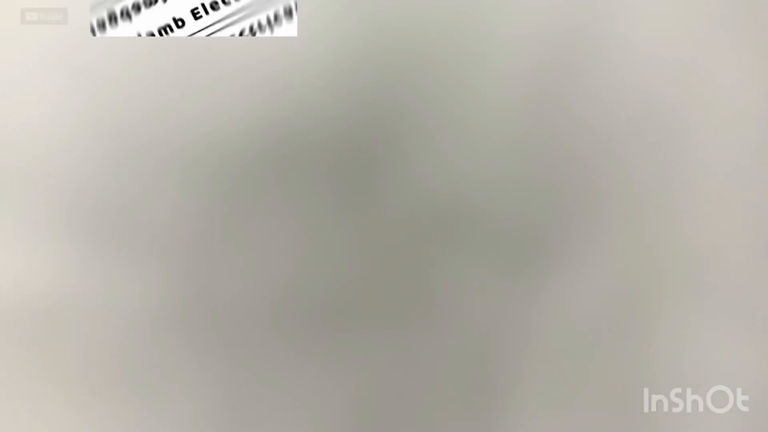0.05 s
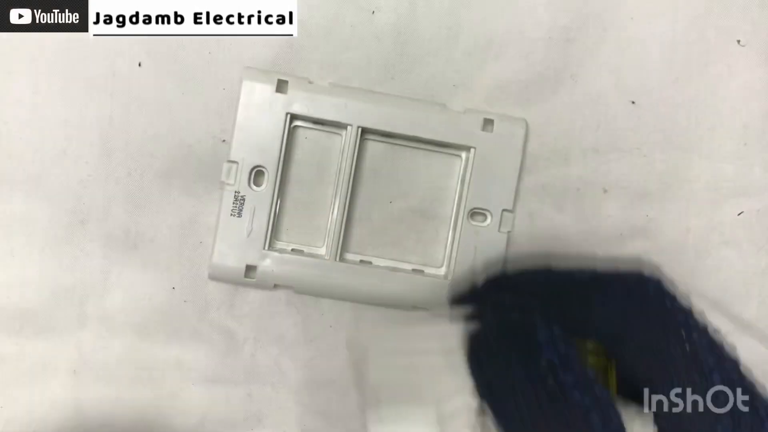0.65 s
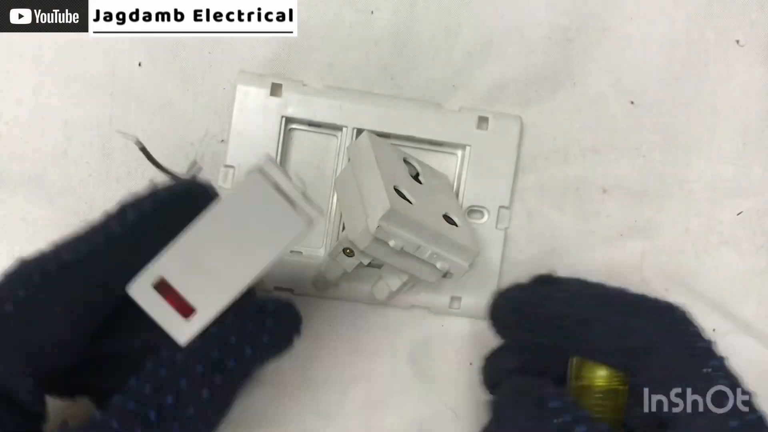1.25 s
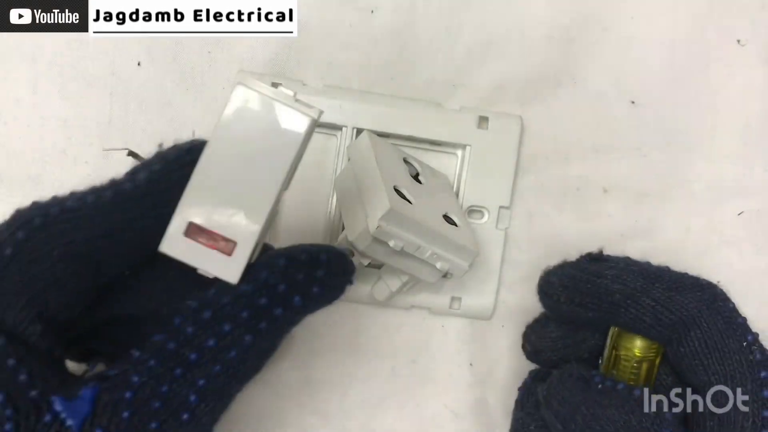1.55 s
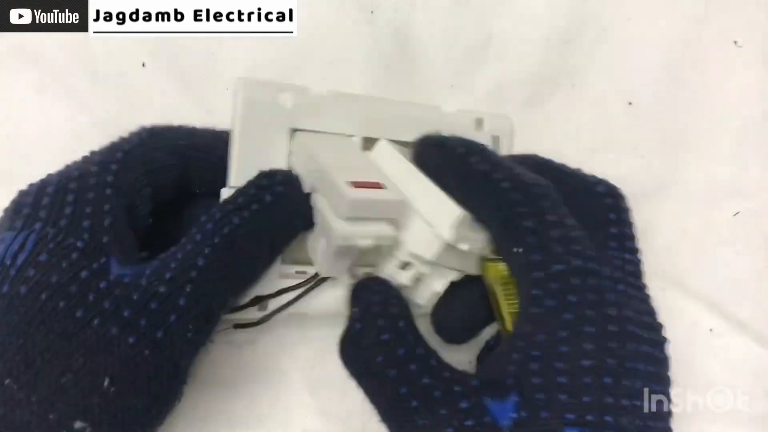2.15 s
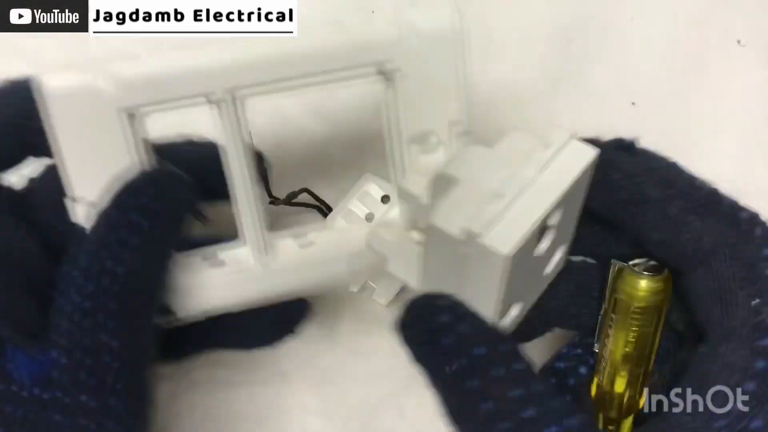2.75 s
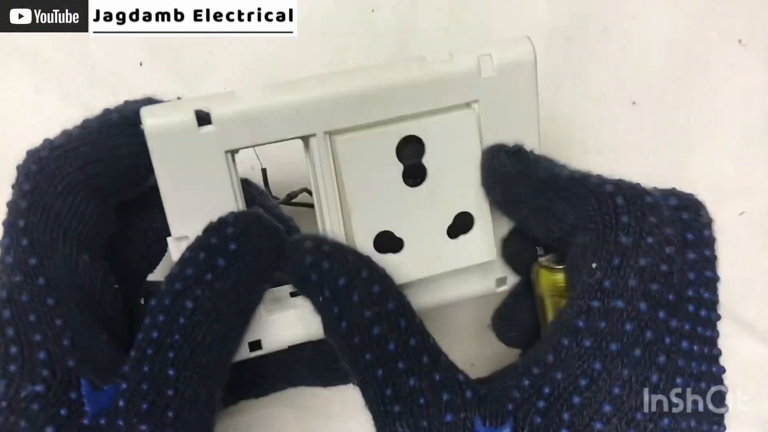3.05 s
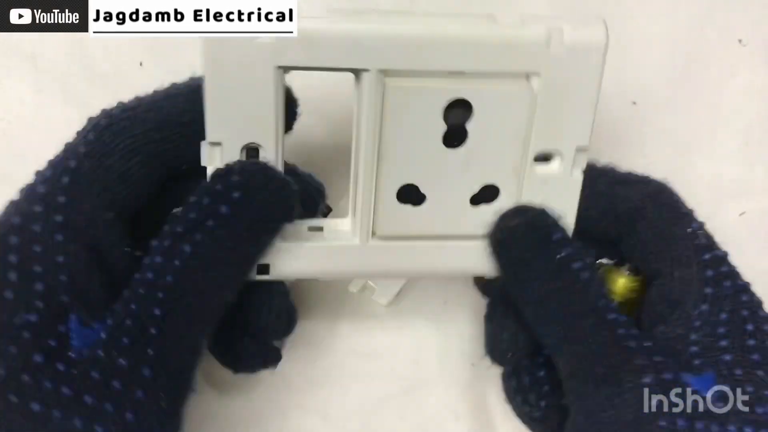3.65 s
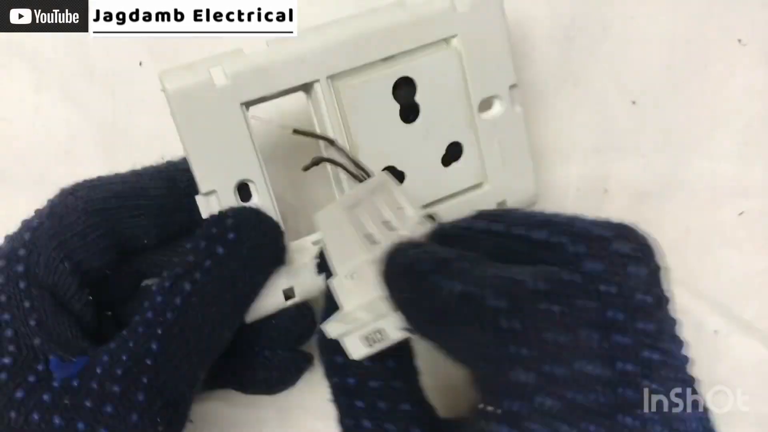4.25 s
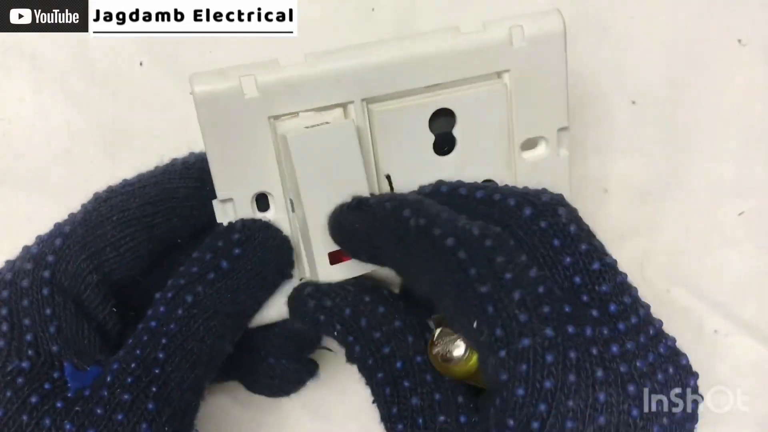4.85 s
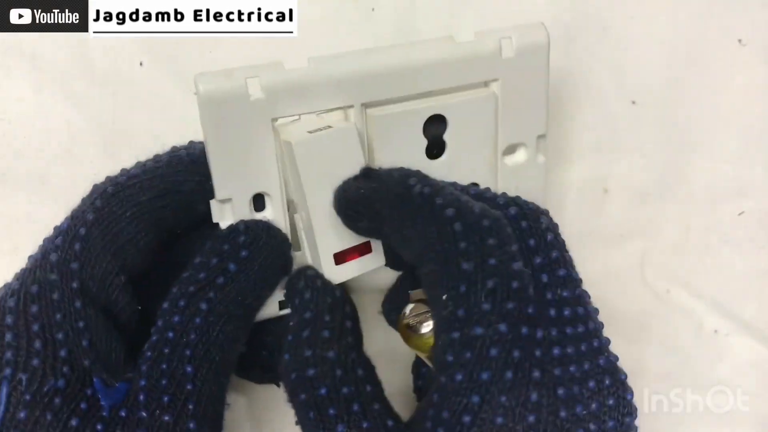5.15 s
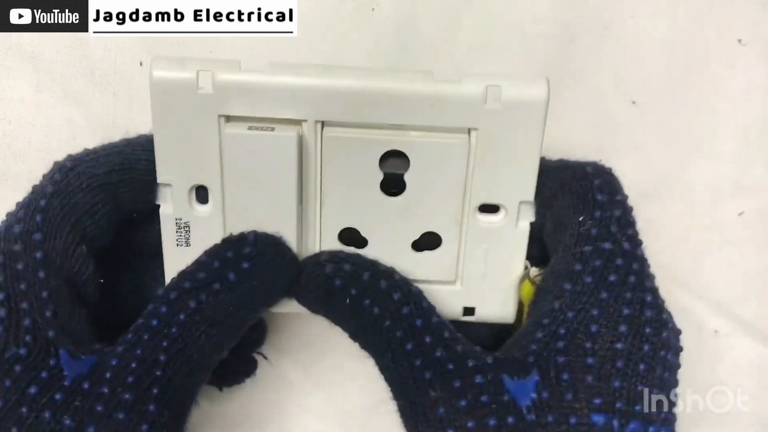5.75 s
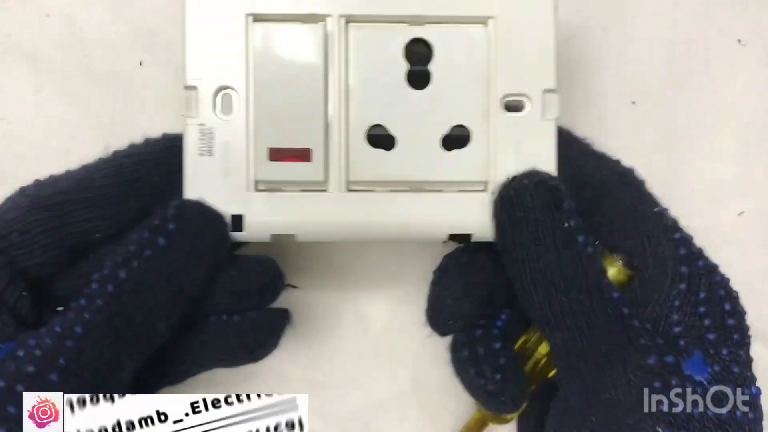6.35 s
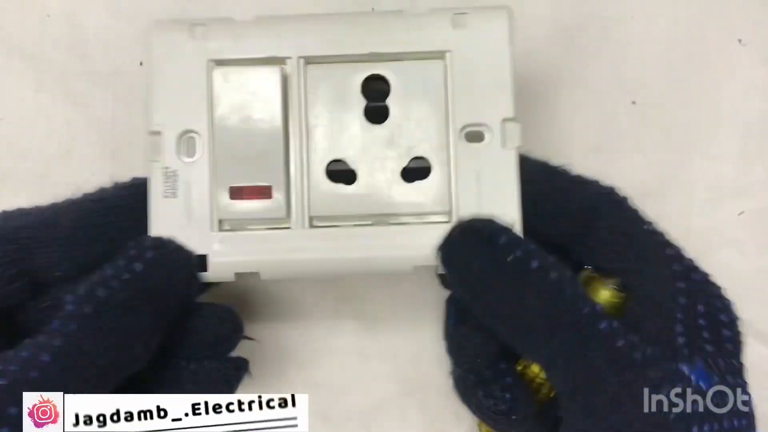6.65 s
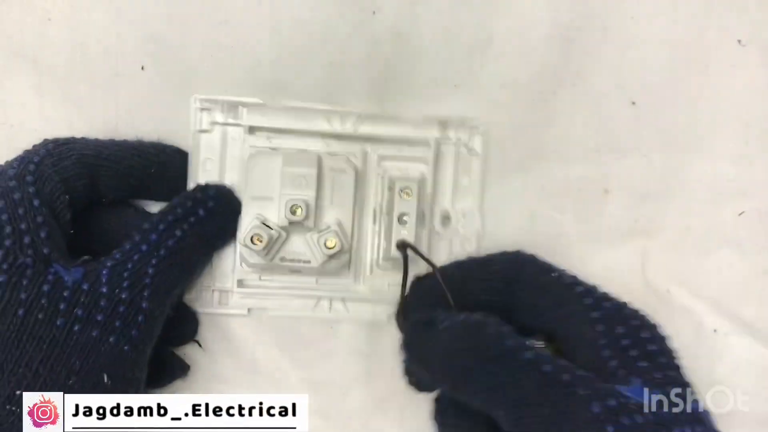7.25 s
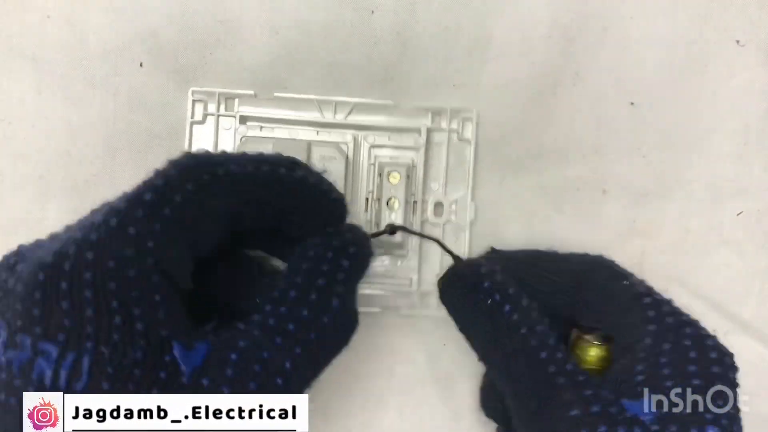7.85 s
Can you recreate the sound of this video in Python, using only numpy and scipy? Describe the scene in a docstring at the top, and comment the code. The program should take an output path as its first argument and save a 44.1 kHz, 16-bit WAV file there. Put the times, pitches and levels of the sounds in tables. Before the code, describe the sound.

Gloved hands assemble a plastic wall socket close to the microphone. After a few light touches, a socket block and then a switch clatter onto a plastic plate, each with a dull thud on the padded work top. A run of short clicks leads to sharp snaps and a faint ring of small springs. More snaps follow before the handling thins out. Gloves rub and loose parts tick over a faint low room hum.

```python
"""Gloved hands assemble a plastic wall socket on a cloth-covered work top, close to one microphone.
After a few light touches the socket block clatters onto its plate (0.8 s), then the switch (1.7 s),
each with a dull thud. From 2 s they are slid about and snapped in, every contact a short, softly smeared
click; small springs sing at 3.4 s. The last snaps come at 5.5 and 6 s, then the handling thins out.
Throughout, gloves rub on the plastic and loose parts tick, over a faint low hum."""
import sys
import numpy as np
from scipy import signal
from scipy.fft import rfft, irfft, next_fast_len
from scipy.io import wavfile
from scipy.ndimage import uniform_filter1d, map_coordinates

SR = 44100
rng = np.random.default_rng(int(sys.argv[2]) if len(sys.argv) > 2 else 0)


def unload_wav(signal):
    """Save mono or channel-first audio to the path in sys.argv[1] as 16-bit WAV at rate SR, clipped to [-1, 1]."""
    wavfile.write(
        sys.argv[1],
        SR,
        np.round(np.clip(np.atleast_2d(signal).T, -1, 1) * 32767).astype(np.int16),
    )


N = 352359
TIME = np.arange(N) / SR
RISE_SHARE, FALL_SHARE = 0.9, 1.14  # shares of a contact's length: it swells faster than it dies

# The plate's broad colour: f/Hz, level/dB
PLATE_COLOUR = [(200, -39), (350, -33), (630, -16), (1000, -16), (1250, -6), (2000, -7), (2800, -5.5),
                (4600, -6.5), (5600, -6), (9400, -6.5), (10600, -12.5), (14400, -2), (15800, -9)]
# The plate's resonances: f/Hz, width/Hz, level/dB
PLATE_MODES = [(1512, 100, 5), (5500, 170, 1), (9350, 200, -6), (11440, 330, 3.5)]
# EQ points of the grip, two for the body, a pivot, two for the treble: f/Hz
GRIP_BANDS = [700, 1450, 3000, 6700, 12500]
# Plastic touches and scrapes, ringing when loose, dry when gripped:
# t/s, level/dB, length/s, body/dB, treble/dB, ring f/Hz, ring level/dB
CONTACTS = [(0.23, -54, 0.0094, -15, -2, 3500, 13.5), (.617, -55, 0.0061, -14.5, -6, 4250, 9.5),
            (0.685, -49, 0.011, -6, 4.5, 3770, 1), (0.846, -42, 0.016, 3, -0.5, 3160, 15),
            (0.938, -44.5, 0.0073, -20, -14, 1990, 22), (0.956, -38, 0.0056, -12, -9, 11730, 25),
            (1.026, -63, .012, -2, 3.5, 2280, 22), (1.129, -53, 0.0092, -6, 0, 1820, 9),
            (1.205, -57, .013, 0.5, 10.5, 2266, 21), (1.658, -50, 0.011, -9.5, 8.5, 2220, 20.5),
            (1.73, -38.5, 0.0074, 3, -6, 2350, 7), (2.013, -34, 0.0051, 8, 0.5, 2710, 11),
            (2.112, -51.5, 0.0095, -9, -7, 2305, 16.5), (2.175, -49, 0.013, -6.5, -8, 4100, 10.5),
            (2.277, -43.5, 0.022, 6.5, 6.5, 2800, 15.5), (2.342, -42, 0.0059, 6, -12, 2153, 20),
            (2.353, -33, 0.0051, -9.5, -9.5, 1824, 26.5), (2.402, -31, 0.0041, -13.5, 3.5, 1502, 5),
            (2.451, -38.5, 0.014, -5.5, 0.5, 1560, 5), (2.503, -30, 0.0074, 5, 4, 2740, 21),
            (2.547, -30.5, 0.0072, -12.5, -7, 2400, 12.5), (2.79, -38, 0.0049, 1, -6, 1390, 9),
            (2.809, -30.5, 0.011, -0.5, -8, 1370, 11), (2.844, -32, 0.01, 4, -6.5, 1330, 9.5),
            (2.861, -35.5, 0.0076, 9, -1, 4020, 21), (2.925, -28.5, 0.012, 3.5, -0.5, 1620, 4),
            (2.975, -38.5, 0.0056, 4, -15, 1200, 12), (2.999, -30.5, 0.0062, 3, -6.5, 1200, 11),
            (3.02, -32, 0.011, 8.5, -1.5, 2960, 10.5), (3.133, -50, 0.012, -8.5, -12, 1310, 19),
            (3.231, -50, .013, -2, -8, 1300, 17), (3.353, -46, 0.023, 5.5, -2, 3420, 12.5),
            (3.385, -30, 0.0051, -5, -3.5, 1480, 23.5), (3.427, -35, 0.0094, 5, -3.5, 1390, 8),
            (3.442, -22, 0.0064, 5, 5, 2100, 16.5), (3.468, -24, 0.0071, 0, -5.5, 1600, 2),
            (3.629, -45.5, 0.012, -5, -4, 1460, 12), (3.799, -50.5, 0.008, 0, -6.5, 2500, 9),
            (3.871, -51.5, 0.0044, -5.5, -14, 1580, 10), (3.916, -49, 0.0068, -5.5, 1, 2266, 19),
            (3.998, -47, 0.0073, -11, -11.5, 2223, 13.5), (4.102, -47.5, 0.0063, 9, 6, 2320, 17.5),
            (4.34, -37.5, 0.0037, 10, -8, 1484, 7.5), (4.352, -41.5, 0.013, 6.5, -5.5, 2220, 9.5),
            (4.44, -33, 0.0093, 9.5, 0.5, 2720, 14), (4.467, -36.5, 0.0061, 8, 5, 2140, 17),
            (4.534, -47, 0.013, 2.5, -12.5, 1810, 3), (4.596, -40.5, 0.0063, 4, -4, 2230, 13),
            (4.611, -46.5, .009, 3, -6, 2190, 11), (4.717, -39.5, 0.0078, 2.5, 3, 2240, 12),
            (5.018, -51.5, 0.0065, 10.5, -1, 2840, 8.5), (5.107, -52.5, .01, -2, -23, 2621, 4),
            (5.205, -31, .0062, -4, -7, 2200, 15), (5.223, -37, 0.0081, -2.5, -7, 1470, 11),
            (5.277, -44.5, 0.0074, -0.5, -8, 8160, 10), (5.319, -44, 0.0086, -7, -12, 8070, 13),
            (5.358, -51.5, 0.0079, -2, -13, 8160, 14), (5.441, -44.5, 0.0069, -3, -2.5, 1430, 20),
            (5.503, -29, .0065, -2, -4.5, 1504, 12.5), (5.525, -25, 0.0061, 1.5, -3.5, 1840, 11),
            (5.559, -22, 0.0047, 11, 12, 2725, 18), (5.578, -46, 0.0053, -1.5, -4, 2750, 13),
            (5.651, -44.5, 0.011, -10, -4.5, 1550, 13), (5.932, -46, 0.0085, 10, -6, 3457, 12.5),
            (6.013, -24, .0087, -1, -1, 1163, 15), (6.042, -19.5, 0.009, -1.5, 0, 1195, 12),
            (6.153, -53, 0.0044, -12, -11, 3680, 16), (6.215, -45, 0.016, 9, -1.5, 1950, 9),
            (6.464, -42, 0.0089, -1, -9, 2690, 6), (6.486, -46, 0.0085, -0.5, -18.5, 6960, 25),
            (6.677, -45, 0.011, -0.5, -6, 2450, 5), (6.728, -38.5, 0.016, -3, -6, 1950, 15.5),
            (6.766, -34, 0.012, 2, 1, 2380, 14.5), (6.831, -29, 0.0056, 1.5, -3.5, 3700, 2),
            (6.916, -50.5, .0075, 4, -5, 2834, 11), (7.292, -52.5, .02, 3, 0, 2320, 7),
            (7.643, -53.5, 0.0066, 1.5, 2.5, 2100, 17)]


def contacts():
    """The plate answers each touch: the grip sets body and treble, the point of contact the rings."""
    out = np.zeros(N)
    for s, db, length, body_db, treble_db, ring_hz, ring_db in CONTACTS:
        grip = list(zip(GRIP_BANDS, (body_db + 1, body_db, 0, treble_db, treble_db)))
        next_mode = (1.24 * ring_hz, ring_db - 6)
        glint = (rng.uniform(4080, 12500), 6)  # one small high mode, woken by chance
        woken = ((ring_hz, ring_db), next_mode, glint)
        rings = [(hz, 55 + 0.04 * hz, lift) for hz, lift in woken]  # higher rings die sooner
        touch = lambda hz: colour(grip, hz) * resonant(rings, hz) * ripple(hz, depth_db=2.63)
        body = lambda hz: plate(hz) * touch(hz)
        add_click(out, s, db, RISE_SHARE * length, FALL_SHARE * length, body, grain_db=2.0)
    return out


def plate(hz):
    """The plastic plate's voice: resonant peaks on a broad colour."""
    return colour(PLATE_COLOUR, hz) * resonant(PLATE_MODES, hz)


# The sharp core of a snap: t/s, level/dB, half length/s, low-pass f/Hz
CRACKS = [(2.0167, -31, 0.0014, 14000), (2.354, -30, 0.00077, 3200), (2.4005, -37.5, .0012, 14000),
          (2.507, -32, .0022, 8000), (2.996, -35, 0.0046, 2200), (3.381, -35, .002, 2200),
          (3.44, -19.5, 0.0016, 15000), (3.4677, -17.5, 0.0026, 15000), (4.01, -50, .0015, 3500),
          (4.355, -39.5, 0.0019, 5930), (5.5205, -27, 0.002, 7000), (5.559, -20.5, 0.0012, 14000),
          (6.011, -27.5, 0.0026, 12000), (6.041, -23.5, 0.0021, 14000)]


def cracks():
    """A catch lets go or an edge strikes, shaking the whole plate for a few milliseconds."""
    out = np.zeros(N)
    for s, db, half, corner_hz in CRACKS:
        body = lambda hz: plate(hz) * ripple(hz, depth_db=1.0) * lowpass(hz, corner_hz)
        add_click(out, s, db, half, half, body, grain_db=-4.5)
    return out


# Each part's double hit as it lands: t/s, level/dB, rise/s, fall/s
SOCKET_HITS = [(0.805, -16.5, 0.0058, .0045), (.811, -20, 0.0034, 0.0063)]
SWITCH_HITS = [(1.701, -16, 0.0051, 0.0039), (1.711, -20.5, .003, .005)]
# Each part's broad colour: f/Hz, level/dB
SOCKET_COLOUR = [(180, -44), (300, -22), (410, -19.5), (610, 1.5), (900, -16), (1250, -2), (2160, -5.5),
                 (3100, -1.5), (4700, -8), (5300, -4), (10600, -11.5), (14100, -3), (15800, -11.5)]
SWITCH_COLOUR = [(180, -58), (300, -57), (633, -9.5), (798, -18.5), (1450, -13), (1860, -10.5),
                 (2050, -10.5), (2910, 1), (4480, -13.5), (5200, -11), (9290, -8), (10100, -12),
                 (15800, -3.5)]
# Each part's resonances: f/Hz, width/Hz, level/dB before the lift
SOCKET_MODES = [(658, 88, -4), (3040, 140, 1), (3300, 47, -14), (3870, 80, 3), (5100, 75, -2),
                (6580, 36, 11), (6870, 27, -3), (7390, 44, -16.5), (8230, 100, 6), (10000, 58, -11.5),
                (11400, 82, -8), (12300, 50, -15), (12600, 87, -10), (13500, 220, -17), (14100, 110, -5.5),
                (14500, 120, 0.5)]
SWITCH_MODES = [(1433, 110, -3.5), (2140, 26, 4.5), (2926, 53, -1.5), (3850, 28, -17), (5170, 69, 2),
                (5780, 62, -3), (6880, 240, -18.5), (9020, 99, -8.5), (10600, 47, -8.5), (12640, 38, -4),
                (13300, 38, -4), (13630, 140, -14), (14600, 48, -3.5), (15600, 23, -24.5)]


def drops():
    """The socket block, then the switch, clatters edge first onto the plate, each with its own ring."""
    out = np.zeros(N)
    socket = lambda hz: colour(SOCKET_COLOUR, hz) * resonant(SOCKET_MODES, hz, lift_db=4.5)
    switch = lambda hz: colour(SWITCH_COLOUR, hz) * resonant(SWITCH_MODES, hz, lift_db=12)
    for s, db, rise, fall in SOCKET_HITS:
        add_click(out, s, db, rise, fall, socket, grain_db=2.5)
    for s, db, rise, fall in SWITCH_HITS:
        add_click(out, s, db, rise, fall, switch, grain_db=0.5)
    return out


# The work top's dark colour: f/Hz, level/dB
WORKTOP_COLOUR = [(40, -9), (70, 3.5), (110, -1.5), (170, -4.5), (250, -7), (350, -14), (500, -7.5),
                  (700, -14), (1200, -36)]
# Its two booming modes: f/Hz, t60/s
WORKTOP_MODES = [(97, 0.23), (172, 0.2)]
# Weight meets the padded top: t/s, level/dB, length/s, low-pass f/Hz, low mode/dB, high mode/dB
THUDS = [(0.423, -47, 0.027, 187, -48, -50), (0.806, -33, 0.0058, 400, -35.5, -45),
         (0.843, -47, .017, 198, -52, -44), (1.707, -38, 0.0084, 480, -51, -43.5),
         (2.407, -42, 0.016, 711, -38, -31), (2.44, -46.5, 0.013, 550, -56, -38),
         (2.581, -48.5, 0.0183, 220, -47.5, -41), (3.466, -54, 0.01, 700, -68.5, -61),
         (6.027, -48.5, 0.015, 400, -51, -69)]


def thuds():
    """The work top takes a dull push through the cloth, then booms on in its two lowest modes."""
    out = np.zeros(N)
    t = np.arange(SR // 2) / SR
    for s, db, length, corner_hz, *mode_dbs in THUDS:
        rise, fall = RISE_SHARE * length, FALL_SHARE * length
        padded = lambda hz: colour(WORKTOP_COLOUR, hz) * lowpass(hz, corner_hz)
        add_click(out, s, db, rise, fall, padded, grain_db=4.5)
        boom = sum(amp(level - 60 * t / t60) * np.sin(2 * np.pi * hz * t)
                   for (hz, t60), level in zip(WORKTOP_MODES, mode_dbs))
        start = round((s - rise) * SR)
        out[start:start + len(t)] += boom * (1 - np.exp(-t / rise))
    return out


# Springs in the pressed socket: t/s, f/Hz, base level/dB, t60/s
SPRINGS = [(3.4, 1292, -44.5, 0.22), (3.4, 1690, -49.5, 0.25), (3.465, 1407, -54.5, 0.43)]
# A spring's harmonics: multiple, level/dB relative to the base
SPRING_HARMONICS = [(1, 12.5), (2, -5), (3, -18.5)]


def springs():
    """Small springs sing on after the snaps with a thin, faint metal ring."""
    out = np.zeros(N)
    for s, hz, db, t60 in SPRINGS:
        t = np.maximum(TIME - s, 0)
        tone = sum(amp(level) * np.sin(2 * np.pi * k * hz * t) for k, level in SPRING_HARMONICS)
        attack = 1 - np.exp(-t / 0.004)
        out += amp(db - 60 * t / t60) * attack * tone
    return out


# A glove slides over the plastic: t/s, level/dB, length/s
STROKES = [(0.248, -61.5, 0.05), (0.379, -59.5, .02), (0.579, -58, .016), (0.803, -61, 0.065),
           (1.014, -63.5, 0.047), (1.183, -61, 0.04), (2.055, -59, 0.047), (2.411, -52, 0.086),
           (2.93, -63.5, 0.12), (3.417, -60, 0.063), (3.698, -59, .06), (4, -55.5, .014),
           (4.122, -57.5, .035), (4.476, -59, .025), (4.738, -65.5, 0.044), (4.959, -60.5, 0.01),
           (5.069, -58.5, 0.0062), (5.414, -58.5, .03), (5.563, -47.5, 0.034), (6.304, -64.5, 0.15),
           (6.872, -57, .03), (6.973, -60, 0.063), (7.801, -70.5, .15)]


def rub_db(t):
    """The rub's envelope: strokes swell and fade over hands that never lie quite still."""
    grip_db = -72
    power = sum((amp(db) * swell((t - s) / length)) ** 2 for s, db, length in STROKES)
    return 10 * np.log10(amp(grip_db) ** 2 + power)


# The bright colour of the rub and the ticks: f/Hz, level/dB
GLOVE_COLOUR = [(710, -37), (1200, -3.5), (1460, -7.5), (1830, -8), (2390, -7.5), (3640, -6.5), (4470, -5),
                (4980, -7.5), (10400, -9.5), (14700, -2), (15800, -14.5)]


def gloves():
    """Knitted fabric hisses over the plastic; each catch briefly wakes another patch of resonances."""
    fibres = rng.standard_normal(N) * amp(1.7 * wobble(900))
    hiss = filtered(fibres, lambda hz: colour(GLOVE_COLOUR, hz))
    spectra = signal.stft(hiss, nperseg=512)[2]
    patches = rng.standard_normal(spectra.shape)
    for axis in (0, 1):  # smear across frequency, then time
        patches = uniform_filter1d(patches, size=5, axis=axis)
    rustle = signal.istft(spectra * amp(3 * unit(patches)), nperseg=512)[1][:N]
    return amp(rub_db(TIME) + 1.6 * wobble(41)) * unit(rustle)


def ticks():
    """Loose parts and wire ends tick dryly at random, more often and louder the more the hands move."""
    out = np.zeros(N)
    count, over_rub_db, spread_db = 50, 1, 14.5
    travel = np.cumsum(amp(rub_db(TIME)))
    body = lambda hz: colour(GLOVE_COLOUR, hz) * ripple(hz, depth_db=1.5)
    for when, size, life in rng.random((count, 3)):
        s = np.interp(when * travel[-1], travel, TIME)
        db = rub_db(s) + over_rub_db + spread_db * size ** 2
        half = 0.0023 + 0.0034 * life
        add_click(out, s, db, half, half, body, grain_db=-2.0)
    return out


# A faint drone that climbs slowly and drops back: t/s, f/Hz, level/dB
DRONE = [(2.2, 61, -70), (3.2, 66, -64.5), (3.7, 72, -53), (4.1, 79, -61), (5.1, 82, -63.5), (5.9, 92, -59),
         (6.6, 64, -66), (7.7, 64, -55.5)]
# The colours of the room's rumble and hiss: f/Hz, relative level/dB
RUMBLE_COLOUR = [(12, -32.5), (20, -6), (32, -3), (51, -2), (107, -13.5), (131, -24.5), (279, -20),
                 (377, -29.5), (447, -28), (550, -35.5), (582, -30), (801, -33), (985, -31), (1440, -33),
                 (1800, -43), (2340, -75.5), (3960, -120)]
HISS_COLOUR = [(880, -20), (1500, -12), (2410, -6.5), (2760, -8), (3530, -25.5), (5960, -15.5),
               (7850, -24.5), (15800, -10.5)]


def room():
    """Room tone: a wavering low hum and a gliding drone on a bed of soft rumble and faint hiss."""
    hum_hz, hum_db = 43.5, -59.5
    hum = amp(hum_db + 3 * wobble(3.3)) * np.sin(2 * np.pi * hum_hz * TIME + 1.1 * wobble(5))
    s, pitch, level = np.transpose(DRONE)
    phase = 2 * np.pi * np.cumsum(np.interp(TIME, s, pitch)) / SR
    drone = amp(np.interp(TIME, s, level) + 1.5 * wobble(3)) * np.sin(phase + 0.5 * wobble(5.5))
    bed = amp(-52.5) * noise(RUMBLE_COLOUR) + amp(-72) * noise(HISS_COLOUR)
    return np.sqrt(2) * (hum + drone) + bed


def add_click(track, s, db, rise, fall, response, grain_db):
    """Mix in one click at time s: a short, grainy burst of noise swells and dies, coloured by a body."""
    offsets = np.arange(-(SR // 9), SR // 9)
    t = offsets / SR
    envelope = swell(t / np.where(t < 0, rise, fall))
    clumps = np.interp(t, np.linspace(t[0], t[-1], 400), rng.standard_normal(400))
    grains = rng.standard_normal(len(t)) * amp(grain_db * clumps)  # uneven grain
    sound = filtered(grains * envelope, response)
    sound *= amp(db) * np.sqrt(np.sum(envelope ** 2) / np.sum(sound ** 2))  # db alone sets the level
    where = round(s * SR) + offsets
    inside = (where >= 0) & (where < N)
    track[where[inside]] += sound[inside]


def swell(x):
    """A bell-shaped envelope, 1 at x = 0."""
    return 1 / np.cosh(np.clip(x, -20, 20))


def amp(db):
    """Decibels to gain."""
    return 10 ** (np.asarray(db) / 20)


def unit(x):
    """Scale to rms 1."""
    return x / np.sqrt(np.mean(x ** 2) + 1e-20)


def colour(points, hz):
    """Gain of an EQ curve through (f/Hz, level/dB) points on a log axis."""
    f, db = np.transpose(points)
    return amp(np.interp(np.log(hz + 1), np.log(f + 1), db))


def resonant(modes, hz, lift_db=0):
    """Gain of resonances that stand out of a flat response."""
    peaks = sum(amp(db + lift_db) ** 2 / (1 + (2 * (hz - centre) / width) ** 2)
                for centre, width, db in modes)
    return np.sqrt(1 + peaks)


def ripple(hz, depth_db):
    """Gain of the crowd of weaker modes, excited differently by every touch."""
    knots = np.linspace(0, SR / 2, 130)
    return amp(depth_db * np.interp(hz, knots, rng.standard_normal(len(knots))))


def lowpass(hz, corner_hz):
    """Gain of a 12 dB per octave treble roll-off."""
    return 1 / np.sqrt(1 + (hz / corner_hz) ** 4)


def filtered(x, response):
    """Shape x with a gain of frequency."""
    size = next_fast_len(len(x) + 400)
    return irfft(rfft(x, size) * response(np.fft.rfftfreq(size, 1 / SR)), size)[:len(x)]


def wobble(rate):
    """A smooth random curve, rate knots a second."""
    knots = rng.standard_normal(int(N * rate / SR) + 4)
    return map_coordinates(knots, [np.arange(N) * rate / SR])


def noise(spectrum):
    """Steady noise of rms 1 with the given colour."""
    return unit(filtered(rng.standard_normal(N), lambda hz: colour(spectrum, hz)))


def scene():
    """A close mono mix: everything happens within reach of the one microphone."""
    return (contacts() + cracks() + drops() + thuds() + springs() + ticks() + gloves() + room())[None]


def record(dry):
    """The microphone thins the deepest bass, and the recorder keeps nothing above its band limit."""
    bass_cut_hz, top_hz = 34, 16030
    band = lambda hz: np.clip((top_hz - hz) / 300, 0, 1) ** 2
    response = lambda hz: band(hz) / np.sqrt(1 + (bass_cut_hz / (hz + 1)) ** 8)
    return np.array([filtered(channel, response) for channel in dry])


dry = scene()
out = record(dry)
unload_wav(out)
```